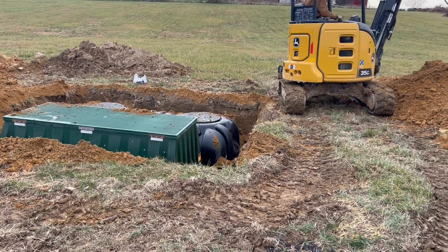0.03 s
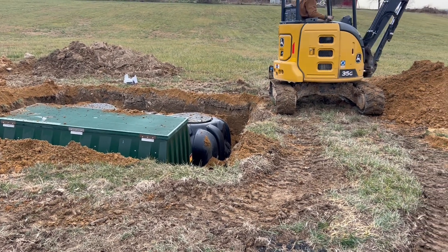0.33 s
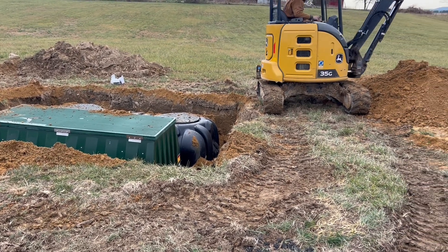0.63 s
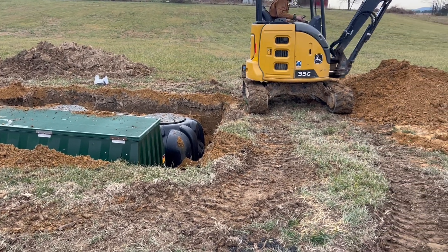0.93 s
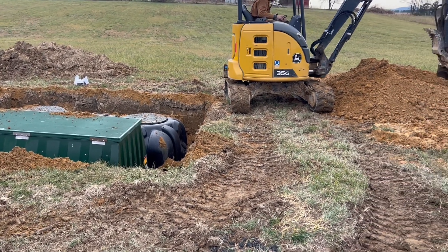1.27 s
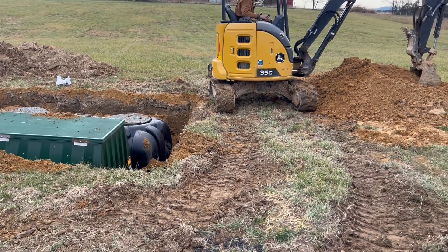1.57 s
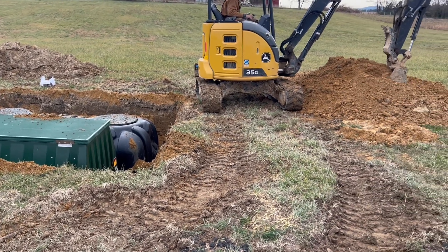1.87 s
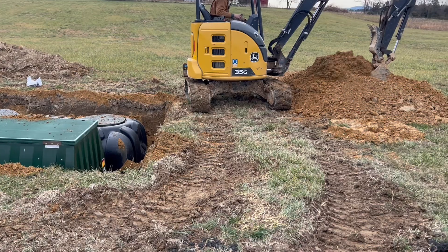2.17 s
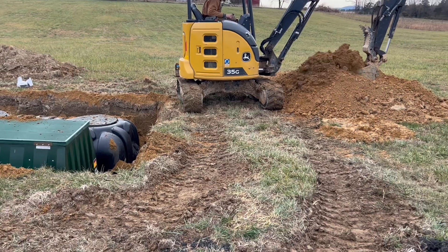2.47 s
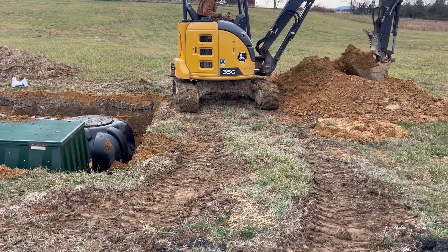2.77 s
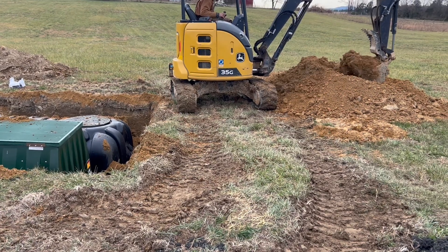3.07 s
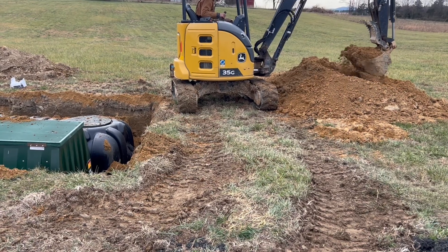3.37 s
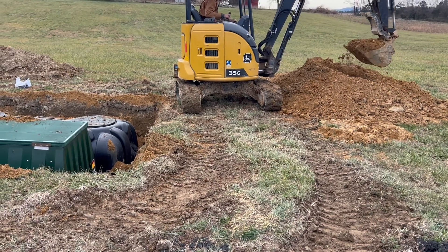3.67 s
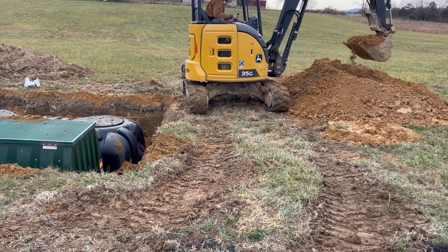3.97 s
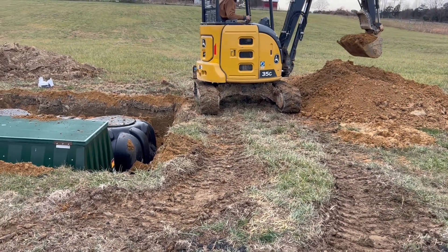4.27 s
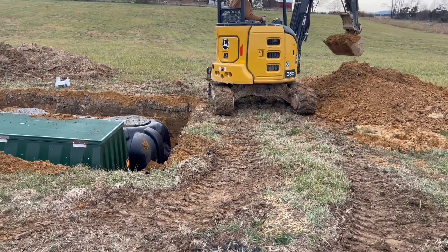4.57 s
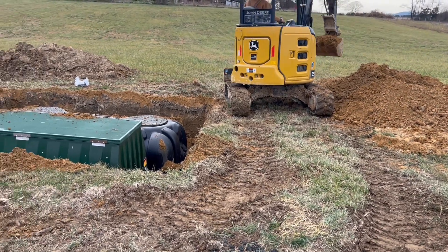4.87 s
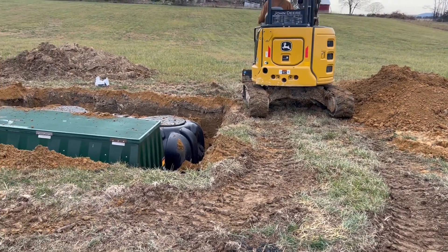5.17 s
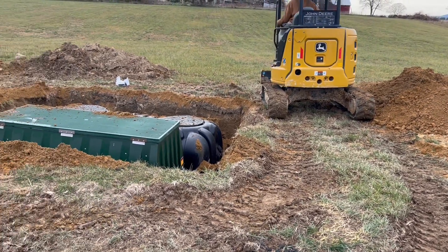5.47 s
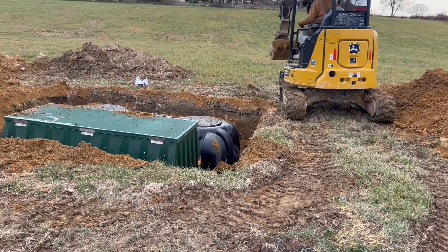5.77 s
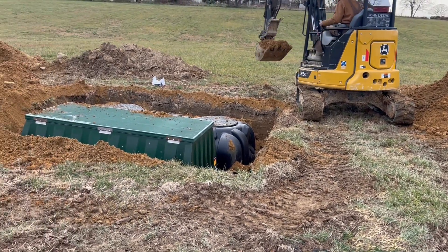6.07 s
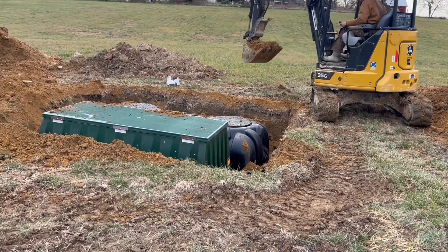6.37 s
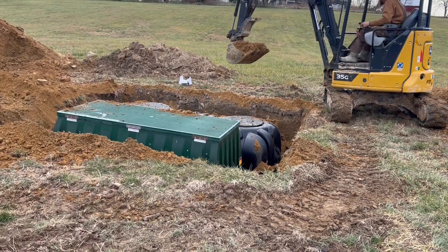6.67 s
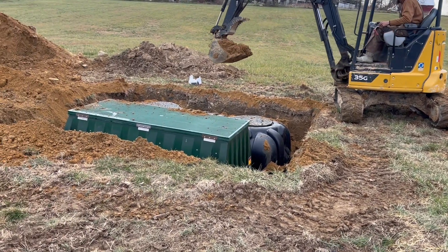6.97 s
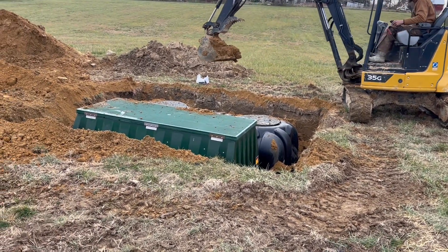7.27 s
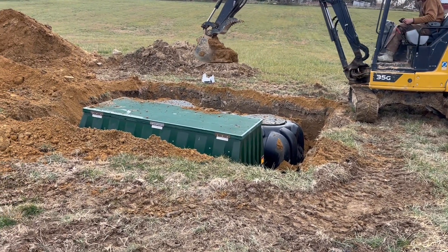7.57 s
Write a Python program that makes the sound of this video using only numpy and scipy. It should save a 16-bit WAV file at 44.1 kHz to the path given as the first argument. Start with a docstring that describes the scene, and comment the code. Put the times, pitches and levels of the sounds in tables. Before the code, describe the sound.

A compact excavator's diesel engine runs throughout, some metres away on open grass: a low drone with a fast metallic clatter, its speed barely wavering under load. Soft hydraulic hiss and a faint pump whine sound in the first second, with a small knock at 0.8 seconds, then dull thumps and a swell of low rumble until about 1.5. Around 2.8 seconds the bucket scrapes briefly through soil and clanks at 3. Muffled thumps follow at 3.4 and 4. From about 4.2 seconds the hydraulic hiss returns and the engine's tone gradually shifts as the machine swings round, throbbing a little more. Low rumble swells between 5.5 and 7.5 seconds, with soft clunks near 5.8 and thumps around 6.5. A light knock at 7.4 leads to a short gritty scrape and a sharp bucket clank at 7.7, with the engine still running.

```python
"""Open grass, some metres from a compact excavator that scoops soil and swings round to a pit.
Its three-cylinder diesel drones and clatters; the colour turns with the cab (right flank, rear,
left flank) and with the bounce off the ground. Oil hisses in the valves, the bucket clanks and
scrapes now and then, and a low rumble with dull thumps comes and goes."""
import sys
import numpy as np
from scipy import signal
from scipy.fft import rfft, irfft, next_fast_len
from scipy.io import wavfile

SR = 44100
rng = np.random.default_rng(int(sys.argv[2]) if len(sys.argv) > 2 else 0)


def dump(signal):
    """Clip the signal to [-1, 1] and save it as 16-bit WAV at the path in sys.argv[1]."""
    limited = np.clip(np.atleast_2d(signal).T, -1, 1)
    pcm = np.round(limited * 32767).astype(np.int16)
    wavfile.write(sys.argv[1], SR, pcm)


N = 344421
T = np.arange(N) / SR


def undb(db):
    """Decibels to gain."""
    return 10 ** (np.asarray(db) / 20)


def unit(x):
    """Scale to rms 1."""
    return x / np.sqrt(np.mean(x ** 2))


def curves(table):
    """Columns of a (time_s, ...) table, one value per sample."""
    times_s, *columns = np.transpose(table)
    return [np.interp(T, times_s, column) for column in columns]


def colour(x, outline):
    """Filter by a (freq_hz, gain_db) outline."""
    hz, db = np.transpose(outline)
    size = next_fast_len(x.shape[-1])
    bins_hz = np.maximum(np.arange(size // 2 + 1) * SR / size, 1)
    gain = undb(np.interp(np.log(bins_hz), np.log(hz), db))
    return irfft(rfft(x, size) * gain, size)[..., :x.shape[-1]]


def wander(rate_hz):
    """Slow random curve, spread near 1."""
    return 1.28 * np.interp(T * rate_hz, np.arange(400), rng.standard_normal(400))


def swell(centre_s, rise_s, peak_db):
    """Gaussian rise and fall of amplitude."""
    return undb(peak_db) * np.exp(-((T - centre_s) / rise_s) ** 2)


def stereo(mid, side):
    """Mid and side to left and right."""
    return mid + np.array([[1], [-1]]) * side


# Firing tone: time_s, level_db
FIRING_LEVEL = [(0.0, -24), (0.6, -25), (0.72, -34), (1.62, -33), (2.28, -20), (2.58, -27.5), (2.88, -20),
                (3.3, -26), (5.7, -18), (5.94, -27.5), (6.72, -25.5), (6.9, -19.5), (7.8, -18)]
# Exhaust radiation round the cab: swing_sides, second_harmonic_db, fourth_harmonic_db
EXHAUST_LOBES = [(0, -28.5, -22), (.2, -29.5, -25.5), (.42, -26.5, -30.5), (0.679, -20.5, -23),
                 (1.3, -22.5, -25), (2.001, -25, -23)]


def exhaust_drone(firings, swing, flutter_db=0.58):
    """Muffled firings: harmonics 1, 2 and 4, their mix turning with the cab."""
    first_db, = curves(FIRING_LEVEL)
    sides, *lobes = np.transpose(EXHAUST_LOBES)
    second_db, fourth_db = (np.interp(swing, sides, lobe) for lobe in lobes)
    second_db += 0.26 * (first_db + 20.5)  # partly follows the firing tone
    out = 0
    for harmonic, db in ((1, first_db), (2, second_db), (4, fourth_db)):
        out += undb(db + flutter_db * wander(18)) * np.sin(2 * np.pi * harmonic * firings)
    return np.sqrt(2) * out


# Oil pressure surges: centre_s, peak_db
PUMP_SURGES = [(.48, -32), (1.061, -38.5), (1.57, -40), (3.47, -40), (5.421, -35.5), (7.35, -37)]


def pump_tone(cycles, rest_db=-46, rise_s=0.13, drift_rad=0.26):
    """Ten pistons, two revolutions per engine cycle; the tone surges with the oil pressure."""
    surge_power = sum(swell(centre_s, rise_s, db) ** 2 for centre_s, db in PUMP_SURGES)
    rms = np.sqrt(undb(rest_db) ** 2 + surge_power)
    return np.sqrt(2) * rms * np.sin(2 * np.pi * 20 * cycles + drift_rad * wander(8))


# Weaker engine tones: cycle_multiple, right_db, rear_db, left_db
ENGINE_ORDERS = [(9, -36.5, -41.5, -35.5), (11, -39.5, -50.5, -41.5), (14, -38.5, -42.5, -39),
                 (15, -36.5, -53, -37.5), (24, -56, -45.5, -43), (29, -42.5, -55.5, -56),
                 (30, -49, -62, -53), (32, -47, -60.5, -52)]


def engine_overtones(cycles, facing, waver_db=3.0, drift_rad=0.26):
    """The cylinders differ, so tones stand on multiples of the whole four-stroke cycle."""
    out = 0
    for multiple, *sides_db in ENGINE_ORDERS:
        level_db = np.array(sides_db) @ facing + waver_db * wander(5)
        phase_rad = 2 * np.pi * (multiple * cycles + rng.random())
        out += undb(level_db) * np.sin(phase_rad + drift_rad * wander(4))
    return np.sqrt(2) * out


# Combustion knock: freq_hz, gain_db
KNOCK_COLOUR = [(900, -26), (1400, -10), (3600, -9), (5000, -25)]


def rattle(firings, throb, repeat_share=0.54, scatter_db=0.8, tick_span_db=3.5, ticks_per_cycle=12):
    """Metal noise that knocks at each firing; valves and injectors tick at set points of each cycle."""
    cycle_phase = firings / 3 % 1
    pattern = signal.resample(rng.standard_normal(2200), 17600)
    repeating = np.interp(cycle_phase, np.linspace(0, 1, len(pattern)), pattern)
    repeating = colour(repeating, [(600, -7.0), (1000, 0.5)])  # mostly above 1 kHz, less low hum
    noise = np.sqrt(repeat_share) * repeating + np.sqrt(1 - repeat_share) * rng.standard_normal(N)
    tick_peaks_db = rng.permutation(np.linspace(0, tick_span_db, ticks_per_cycle))
    ticks = cycle_phase * ticks_per_cycle
    tick_db = tick_peaks_db[ticks.astype(int) % ticks_per_cycle] * np.exp(-2 * (ticks % 1))
    firing_db = scatter_db * rng.standard_normal(600)[firings.astype(int)]
    metal = np.array([noise, rng.standard_normal(N)]) * throb * undb(tick_db + firing_db)
    knock_phase = (firings + .17) % 1  # leads the throb
    knock = unit(1 + undb(5) * np.exp(-knock_phase / .26))
    mid, side = metal + colour(metal, KNOCK_COLOUR) * (knock - 1)
    return unit(mid), unit(side)


# Housing colour on each side: freq_hz, gain_db
RIGHT_COLOUR = [(200, -28), (330, 0), (460, -9.5), (570, -1.5), (810, -6), (1040, -9.5), (1170, -17.5),
                (1450, -13), (1950, -14), (2450, -23), (3000, -19.5), (3700, -26), (7100, -35)]
REAR_COLOUR = [(200, -25.5), (380, -8), (650, -10), (850, 0), (1200, -10.5), (1500, -12.5), (1950, -18.5),
               (2350, -19), (3600, -21), (3950, -26), (4900, -33), (5500, -34.5), (7100, -42)]
LEFT_COLOUR = [(200, -16), (350, 4), (600, -1), (900, -3), (1280, -15), (1420, -5.5), (1680, -16.5),
               (2180, -16), (2900, -19), (5300, -21.5), (7100, -38.5)]
# Ground reflection: time_s, delay_ms, gain
GROUND_BOUNCE = [(4.2, 0.29, .13), (4.9, 0.46, 0.062), (5.3, 0.71, 0.45), (5.85, 0.72, 0.21),
                 (7, 0.99, 0.49), (7.8, 0.84, 0.64)]
# Its loss in the grass: freq_hz, gain_db
GRASS_LOSS = [(2200, -2), (5000, -12.5)]


def clatter(firings, swing, facing, throb, diffuse_db_per_side=6.5):
    """The rattle leaves each side of the housing with its own colour and meets its ground bounce."""
    level_db = -33 - 1.04 * swing
    mid, side = rattle(firings, throb)
    side = colour(side, [(500, -25), (1150, -21.5), (1550, -12.5), (2300, -24.5), (5000, -19.0)])
    source = np.array([mid, side * undb(diffuse_db_per_side * swing)])
    direct = 0
    for share, outline in zip(facing, (RIGHT_COLOUR, REAR_COLOUR, LEFT_COLOUR)):
        radiated = colour(source, outline)
        direct += share * undb(level_db) * radiated / np.std(radiated[0])
    delay_ms, bounce_gain = curves(GROUND_BOUNCE)
    bounce = np.array([np.interp(T - delay_ms / 1000, T, channel) for channel in direct])
    return stereo(*(direct + bounce_gain * colour(bounce, GRASS_LOSS)))


# Oil through the control valves: start_s, end_s, level_db, tilt_db_per_octave
OIL_RUSHES = [(-.1, 1.05, -58, -5), (4.243, 5.2, -58.5, 3), (4.621, 5.45, -56, -6),
              (5.228, 5.795, -72, -39), (5.92, 7.25, -54, 3.5), (6.756, 7.697, -58, -2)]


def oil_flow(octaves, open_s=0.084, close_s=0.64):
    """Summed rush amplitude, octaves above the tilt pivot; valves open quickly and ease shut."""
    flow = 0
    for start_s, end_s, level_db, tilt_db_per_octave in OIL_RUSHES:
        opening = np.clip(np.minimum((T - start_s) / open_s, (end_s - T) / close_s), 0, 1)
        flow += opening * undb(level_db + tilt_db_per_octave * octaves)
    return flow


# Valve block resonances: rear_hz, flank_hz, gain_db
VALVE_MODES = [(1567, 1200, -1.5), (2097, 2230, 4.5), (2795, 3150, -2), (3565, 4250, 1), (4380, 5600, 0),
               (5820, 6500, -4.5), (6735, 5900, -10)]
# Hiss from the vents: freq_hz, gain_db
VENT_COLOUR = [(1400, -9.5), (2300, -0.5), (3700, 6.5), (3950, -12.5), (7000, -26)]


def valve_hiss(throb, right_flank, pivot_hz=2870, rear_s=5.7, slide_s=1.7, vent_db=10.5, side_db=-17):
    """Oil excites valve block resonances that slide as the cab turns; right-flank vents leak hiss."""
    top_hz = VALVE_MODES[-1][0]
    half_width_hz = .06 * top_hz
    skirt = [(half_width_hz * ratio, db) for ratio, db in ((.5, 0), (1, -4), (2, -13), (8, -55))]
    noise = unit(colour(rng.standard_normal((2, N)), skirt))
    flank_share = np.minimum(np.abs(T - rear_s) / slide_s, 1)
    modes = 0
    for rear_hz, flank_hz, gain_db in VALVE_MODES:
        # slowed noise: bandwidth scales with pitch
        slowed = np.array([np.interp(T * rear_hz / top_hz, T, channel) for channel in noise])
        phase_rad = 2 * np.pi * np.cumsum(rear_hz + (flank_hz - rear_hz) * flank_share) / SR
        band = slowed * np.cos(phase_rad) + slowed[::-1] * np.sin(phase_rad)
        modes += undb(gain_db) * oil_flow(np.log2(rear_hz / pivot_hz)) * band
    vent_noise = unit(colour(rng.standard_normal((2, N)), VENT_COLOUR))
    vents = undb(vent_db) * right_flank * oil_flow(0) * vent_noise
    mid, side = (modes + vents) * throb
    return stereo(mid, undb(side_db) * side)


# Rumble spectrum: freq_hz, gain_db
LOW_COLOUR = [(22, -27.5), (48, 1.5), (75, 3), (160, -7), (250, -8), (340, -20.5), (1000, -57)]
# Slow swells: centre_s, rise_s, peak_db
LOW_SWELLS = [(1.204, 1, -23), (5.78, 0.38, -20.5), (6.499, 1, -20.5)]


def rumble(steady_db=-27.5, steady_side_db=-19.5, swell_side_db=-6.5):
    """Uneven low noise; the swells are wider in stereo than the steady part."""
    swell_power = sum(swell(*row) ** 2 for row in LOW_SWELLS)
    steady_power = undb(steady_db) ** 2
    side_power = steady_power * undb(steady_side_db) ** 2 + swell_power * undb(swell_side_db) ** 2
    mid, side = unit(colour(rng.standard_normal((2, N)), LOW_COLOUR))
    return stereo(mid * np.sqrt(steady_power + swell_power), side * np.sqrt(side_power))


# Thumps and clunks: start_s, peak_db, pitch_hz, t60_s
DULL_THUMPS = [(.771, -22.5, 864, 0.027), (0.796, -23.5, 984, .035), (.818, -17, 1053, .045),
               (.834, -20.5, 882, .045), (.968, -10, 117.6, 0.059), (1.061, -10, 98.6, 0.096),
               (1.454, -15, 64.8, 0.26), (2.989, -17, 431, 0.027), (3.398, -8.5, 100, 0.061),
               (3.402, -20, 353, 0.045), (4.032, -16.5, 78.4, 0.26), (5.761, -19, 345, 0.099),
               (5.799, -16, 378, 0.053), (5.842, -14.5, 101.8, 0.051), (5.844, -16, 361, 0.026),
               (6.405, -8, 82.4, 0.062), (6.637, -9, 107.5, 0.27), (7.708, -17.5, 852, .032)]


def thumps(rise_s=0.0041, grit_gain=0.26):
    """Soft, heavily damped bumps: a sine roughened by noise."""
    out, t = np.zeros(N + SR), T[:SR // 4]
    for start_s, peak_db, pitch_hz, t60_s in DULL_THUMPS:
        outline = [(pitch_hz * k, db) for k, db in ((.25, -30), (1, 0), (2, -6), (6, -45), (20, -90))]
        grit = unit(colour(rng.standard_normal(len(t)), outline))
        envelope = (1 - np.exp(-t / rise_s)) * undb(-60 * t / t60_s)
        bump = (np.sin(2 * np.pi * pitch_hz * t) + grit_gain * grit) * envelope
        out[int(start_s * SR):][:len(t)] += undb(peak_db) * bump / np.abs(bump).max()
    return out[:N]


# Bucket and linkage blows, relative levels: start_s, body_db, mid_db, treble_db, t60_s, contact_s, ring_db
BLOWS = [(.811, -15.5, -26, -33, .06, 0.0064, -6), (2.9824, -16, -19.5, -17, 0.053, 0.0017, 3),
         (2.9864, -3.5, -18.5, -16, 0.043, 0.00067, -3), (3.061, -26, -30.5, -57, 0.23, 0.0038, 0),
         (7.441, -17, -28, -21, 0.12, 0.0051, -2.5), (7.7046, 2.5, -11, -19, 0.026, 0.00031, -13),
         (7.7712, -24.5, -21.5, -25.5, 0.02, 0.00054, -8)]
# Soil-damped bucket: pitch_hz, gain_db
BUCKET_MODES = [(620, -1.5), (940, 0.5), (1300, -5), (2230, -7), (2470, 0.5), (2750, -1.5), (3300, -13.5),
                (4020, -5.5), (4380, 0.5), (4700, 1.5), (5400, 0), (6650, 2.5)]


def bucket_clanks(crack_db=8, trickle_db=-11, side_db=-6):
    """Each blow cracks, rings the bucket briefly and leaves a trickle of grit."""
    out, t = np.zeros((2, N + SR)), T[:SR // 4]
    pitch_hz, mode_db = np.transpose(BUCKET_MODES)[:, :, None]
    for start_s, body_db, mid_db, treble_db, t60_s, contact_s, ring_db in BLOWS:
        force, phase = rng.standard_normal((2, len(BUCKET_MODES), 1))
        modes = undb(ring_db + mode_db + 2 * force) * np.sin(2 * np.pi * (pitch_hz * t + phase))
        ring = modes.sum(0) * undb(-60 * t / t60_s)
        crack = undb(crack_db) * np.exp(-t / (.085 * t60_s))
        trickle = undb(trickle_db) * np.exp(-t / (.45 * t60_s))
        mid, side = rng.standard_normal((2, len(t))) * (crack + trickle)
        blow = np.array([ring + mid, undb(side_db) * side]) * (1 - np.exp(-t / contact_s))
        outline = [(150, body_db - 18), (600, body_db - 11), (1300, body_db - 13.5), (1700, mid_db - 4),
                   (3200, mid_db - 6), (4300, treble_db - 8.5), (7000, treble_db - 28.5)]
        out[:, int(start_s * SR):][:, :len(t)] += colour(blow, outline)
    return stereo(*out[:, :N])


# Soil over the bucket: start_s, length_s, level_db
SOIL_STROKES = [(2.778, 0.16, -37), (2.944, .13, -33.5), (7.612, 0.077, -30.5), (7.687, 0.018, -27.5)]
# Scrape spectrum: freq_hz, gain_db
SOIL_COLOUR = [(250, -5), (450, 3.5), (900, 7.5), (1700, -6), (3100, -2.5), (3800, -14.5), (7000, -25)]


def soil_scrapes(grain_db=5, side_db=-11.5):
    """Grains of soil drag over the steel in short strokes."""
    strokes = 0
    for start_s, length_s, level_db in SOIL_STROKES:
        arch = 1 - (2 * (T - start_s) / length_s - 1) ** 2
        strokes += undb(level_db) * np.sqrt(np.maximum(arch, 0))
    grains = rng.standard_normal((2, N)) * undb(grain_db * rng.standard_normal(N))
    mid, side = unit(colour(grains, SOIL_COLOUR)) * strokes
    return stereo(mid, undb(side_db) * side)


# Engine speed, sagging under load, then overshooting: time_s, firing_hz
ENGINE_SPEED = [(0.0, 60.9), (0.54, 59.7), (1.98, 60.3), (2.16, 61.8), (2.58, 59.2), (2.88, 61.4),
                (3.12, 59.1), (3.42, 60.0), (4.56, 60.5), (4.8, 61.2), (5.04, 60.8), (5.16, 59.7),
                (5.4, 60.3), (5.88, 60.6), (6.72, 59.0), (6.96, 60.1), (7.62, 60.4), (7.8, 61.2)]
# Side heard (0 right flank, 1 rear, 2 left flank): time_s, swing_sides
CAB_SWING = [(0, .45), (1.2, 0), (3.6, 0), (4.3, 0.21), (4.85, 0.41), (5.3, 0.63), (5.85, 1.18),
             (6.1, 1.57), (6.5, 2.2)]


def scene():
    """One crankshaft drives all engine layers; the swing sets which side is heard."""
    firing_hz, = curves(ENGINE_SPEED)
    swing, = curves(CAB_SWING)
    firings = np.cumsum(firing_hz) / SR
    cycles = firings / 3
    facing = np.maximum(1 - np.abs(np.clip(swing, 0, 2) - np.arange(3)[:, None]), 0)  # share per side
    throb_db = 0.45 + 1.4 * np.minimum(swing, 1)  # deeper from the rear and left
    throb = undb(throb_db * np.cos(2 * np.pi * firings))
    tones = exhaust_drone(firings, swing) + pump_tone(cycles) + engine_overtones(cycles, facing)
    machine = tones + clatter(firings, swing, facing, throb) + valve_hiss(throb, facing[0])
    return machine + rumble() + thumps() + bucket_clanks() + soil_scrapes()


# Phase between microphone ports: freq_hz, left_lead_rad
PORT_PHASE = [(1250, 0.2), (1680, -1.2), (2400, 0.53), (3000, 1), (3600, 1.3), (4400, 0.84), (5500, -0.85)]
# Level between them: freq_hz, left_excess_db
PORT_LEVEL = [(90, -0.4), (170, -4), (400, 1), (840, -2), (1430, 0.9), (4100, 0.8)]


def record(dry, cutoff_hz=6980):
    """Two microphone ports, slightly out of step and unequally loud, then a steep low-pass."""
    size = next_fast_len(N)
    bins_hz = np.arange(size // 2 + 1) * SR / size
    excess_db = np.interp(bins_hz, *np.transpose(PORT_LEVEL))
    lead_rad = np.interp(bins_hz, *np.transpose(PORT_PHASE))
    left = undb(excess_db / 2) * np.exp(.5j * lead_rad)
    heard = irfft(rfft(dry, size) * np.array([left, 1 / left]), size)[:, :N]
    return signal.sosfilt(signal.ellip(8, .2, 80, cutoff_hz, fs=SR, output="sos"), heard)


dry = scene()
out = record(dry)
dump(out)
```